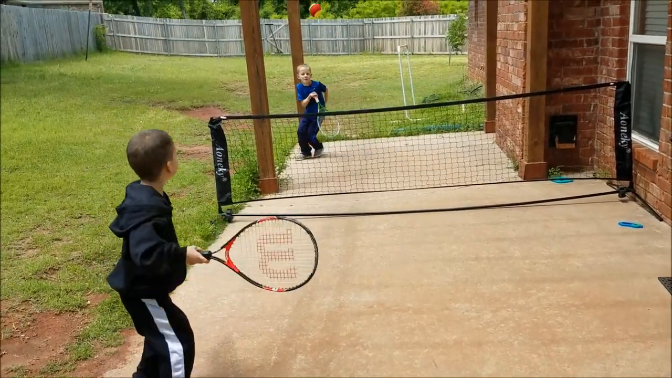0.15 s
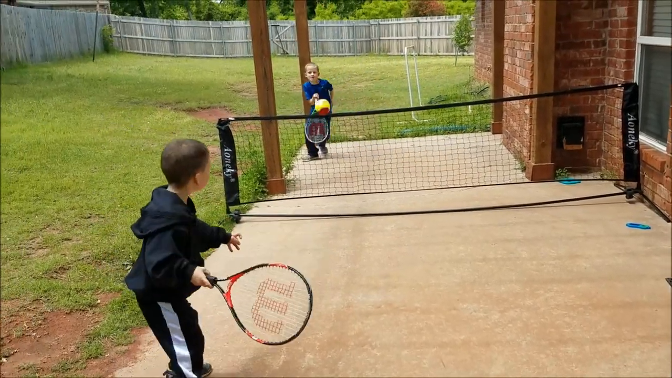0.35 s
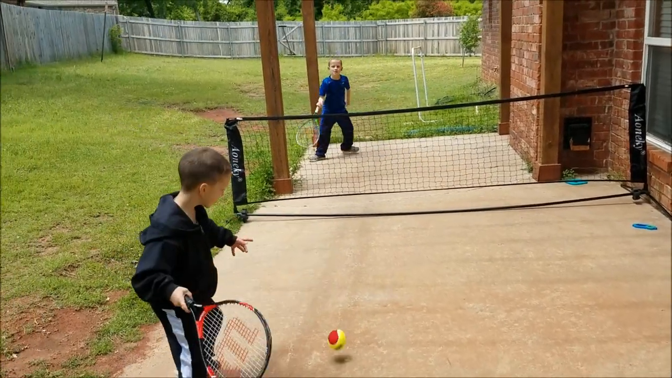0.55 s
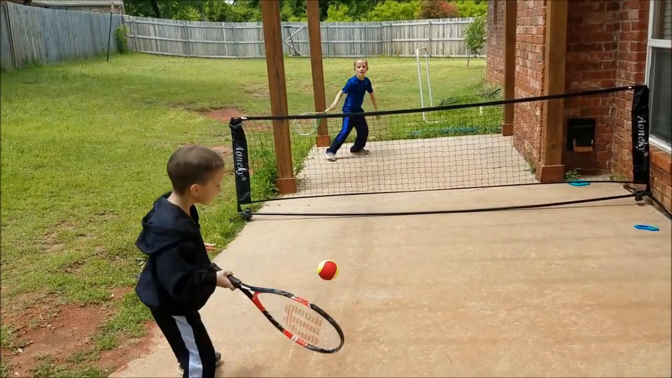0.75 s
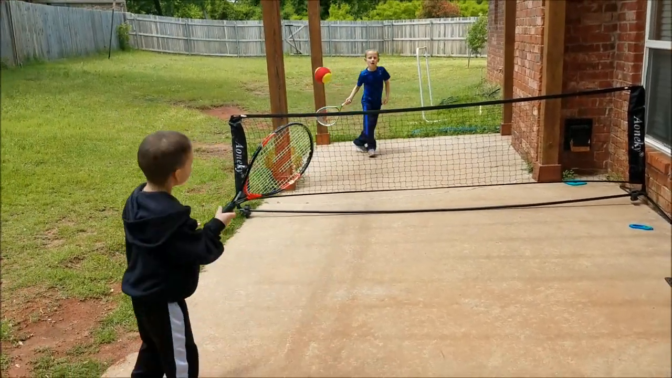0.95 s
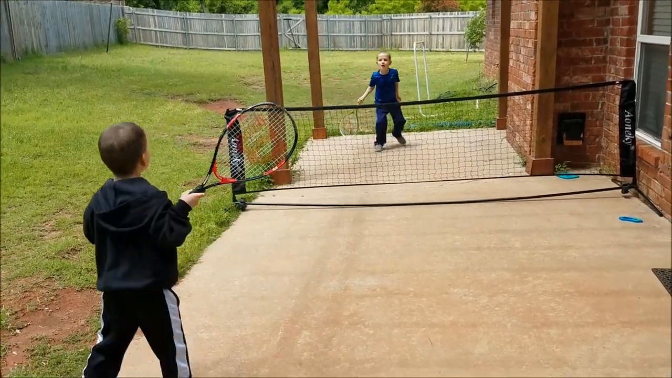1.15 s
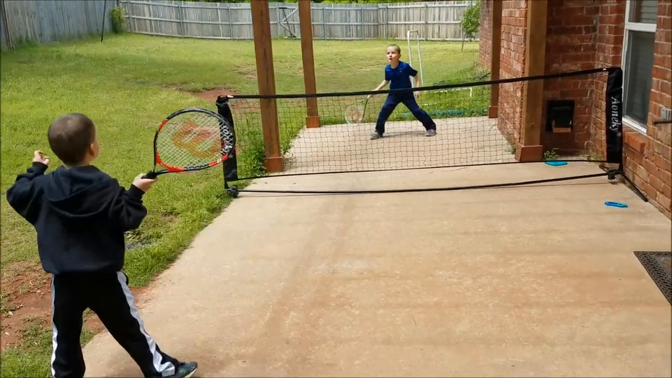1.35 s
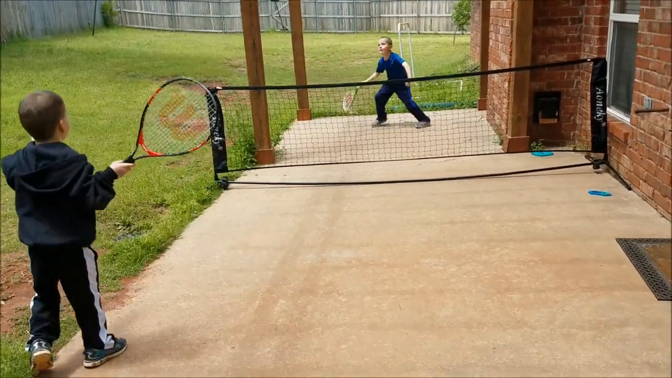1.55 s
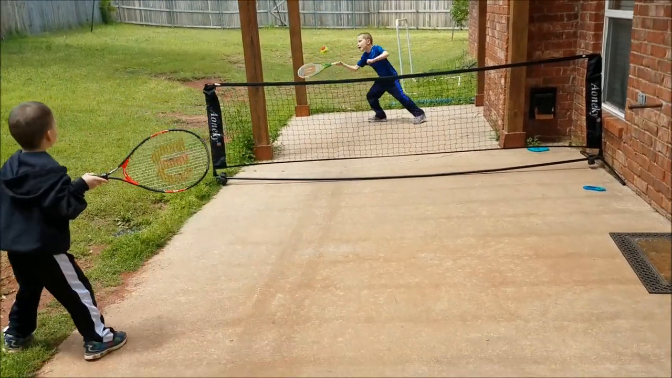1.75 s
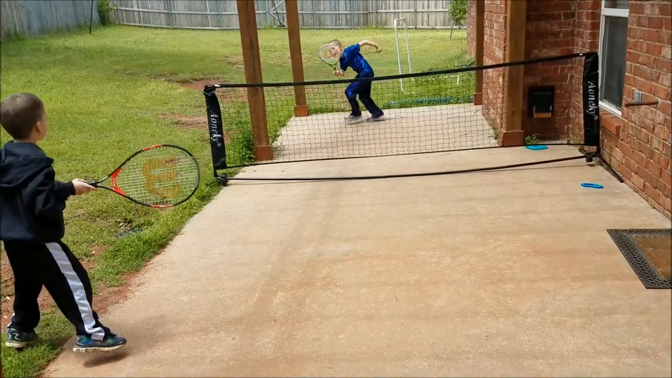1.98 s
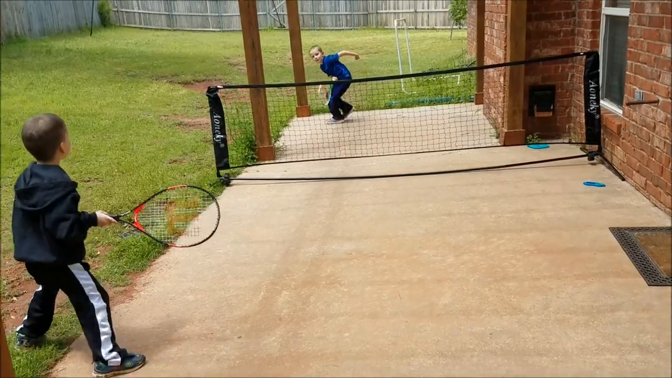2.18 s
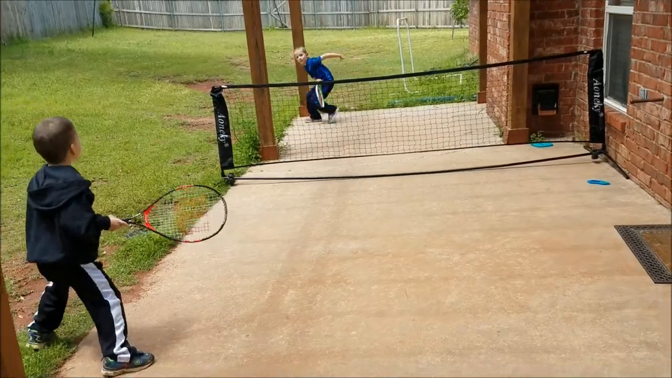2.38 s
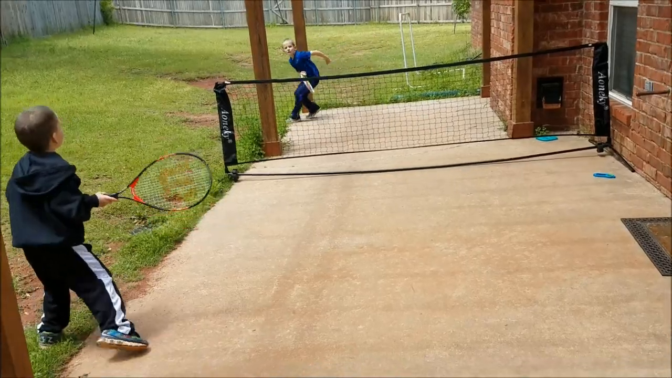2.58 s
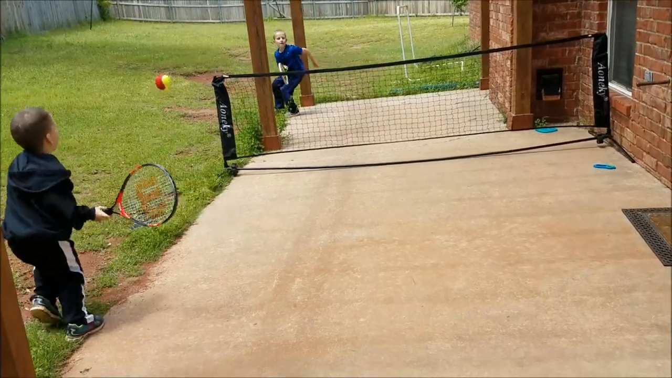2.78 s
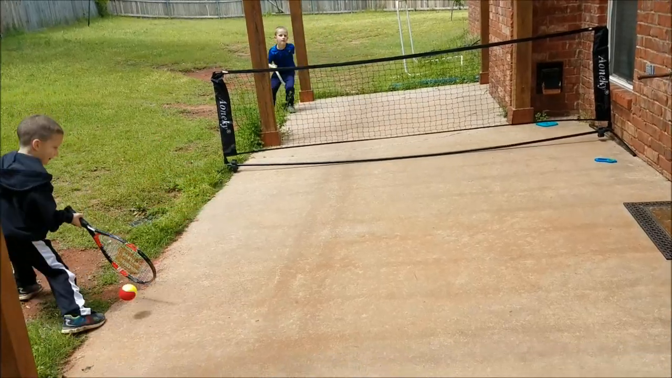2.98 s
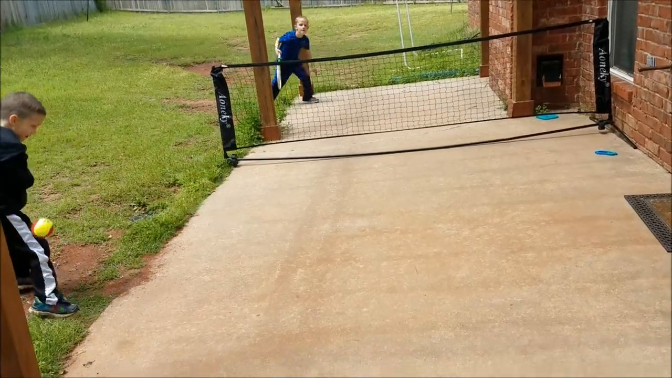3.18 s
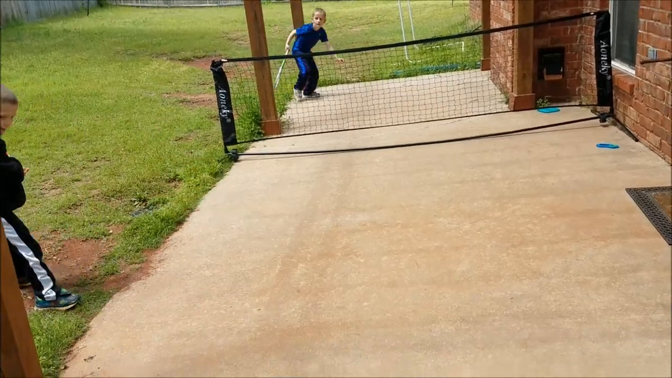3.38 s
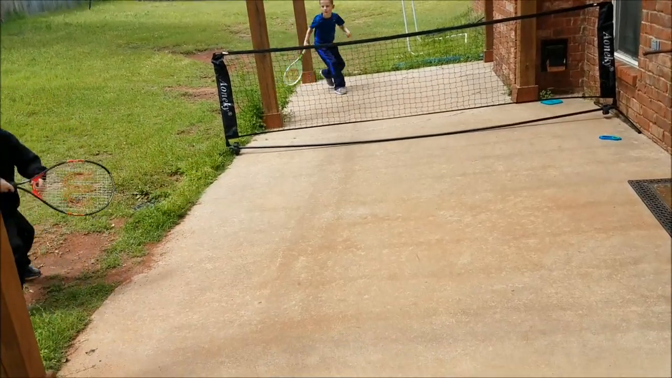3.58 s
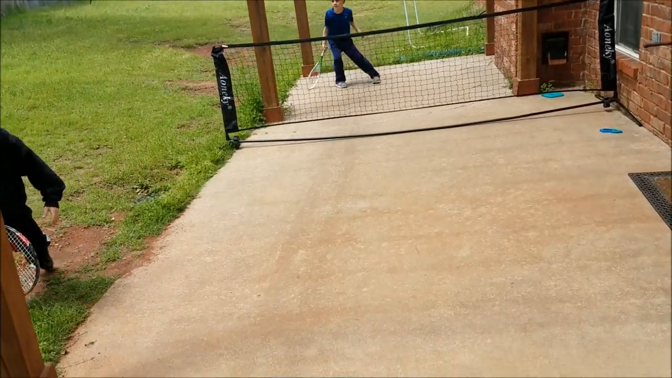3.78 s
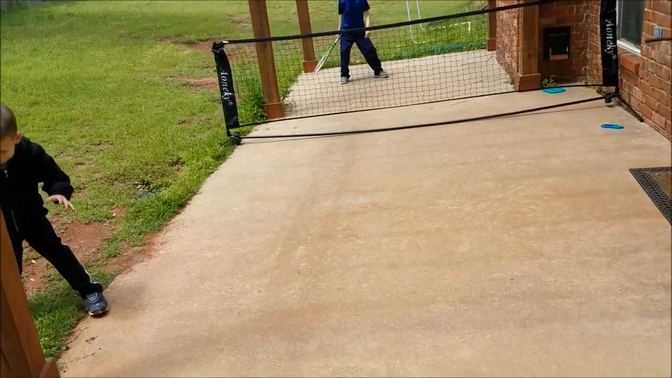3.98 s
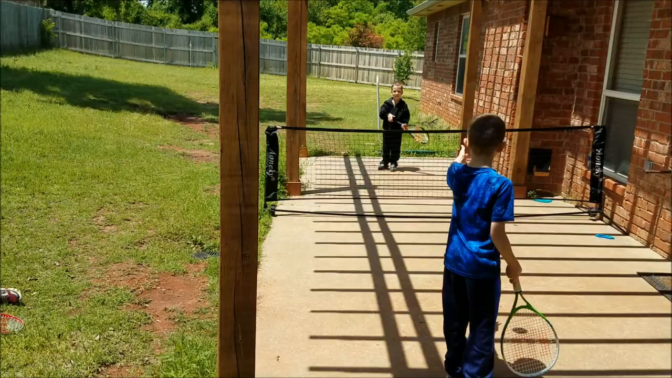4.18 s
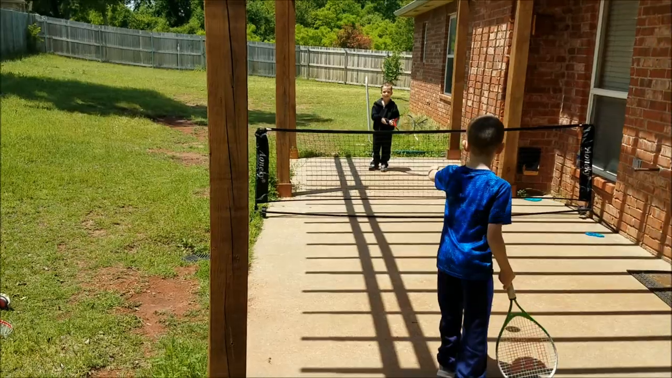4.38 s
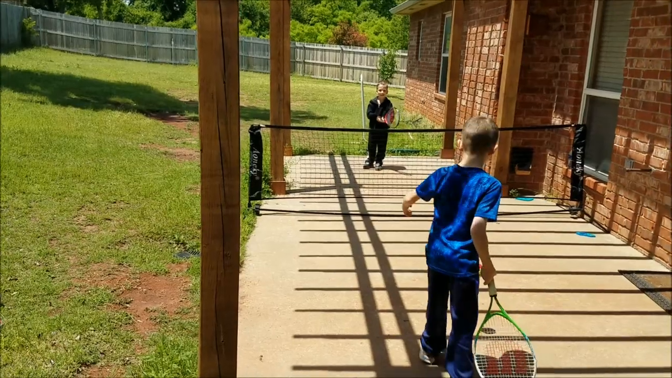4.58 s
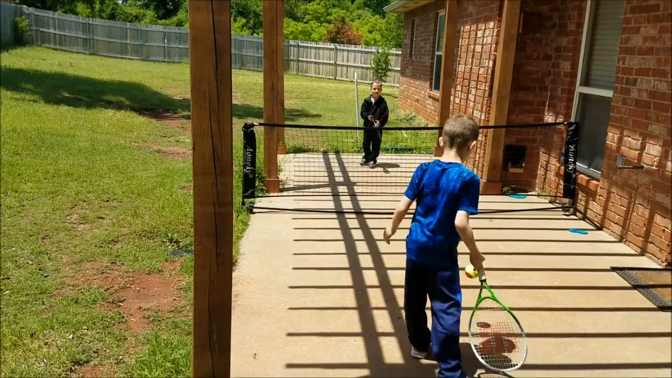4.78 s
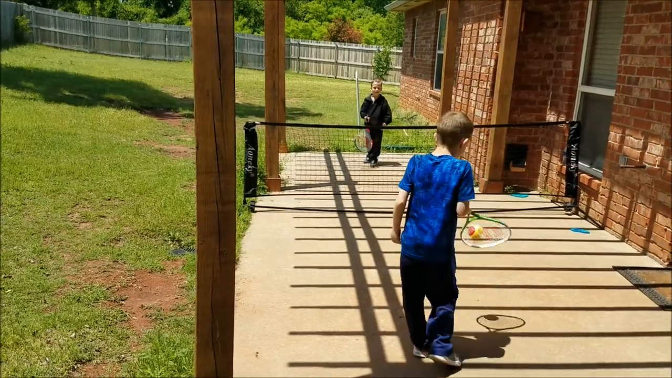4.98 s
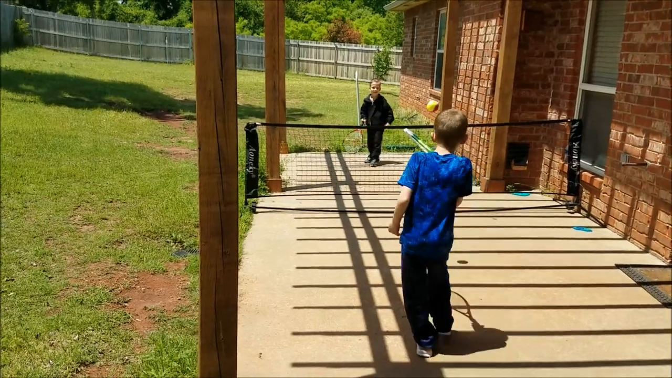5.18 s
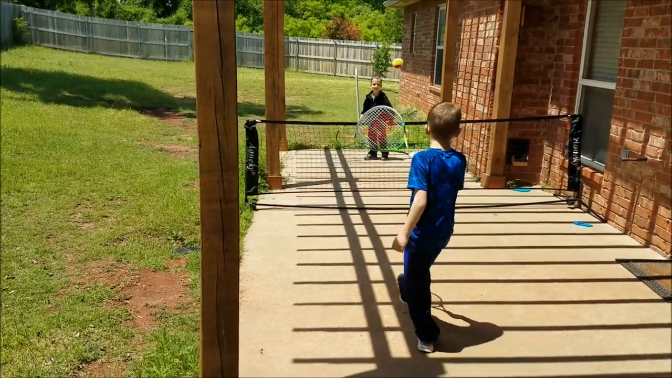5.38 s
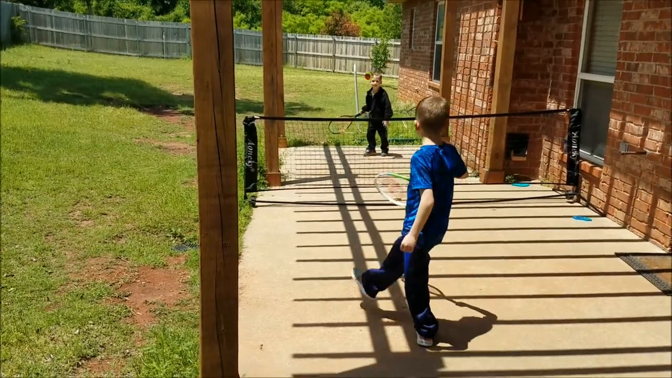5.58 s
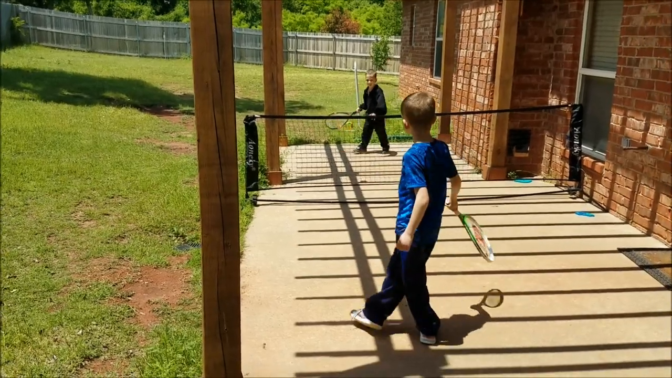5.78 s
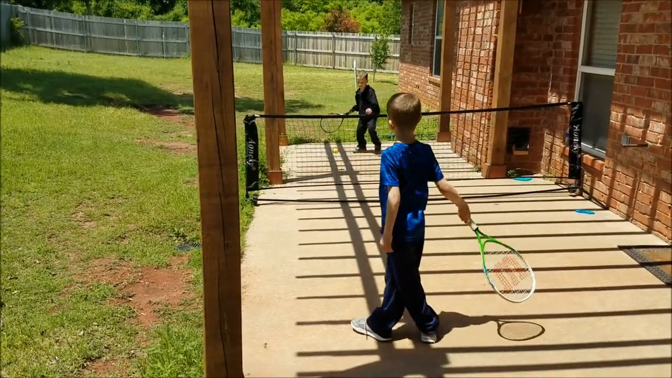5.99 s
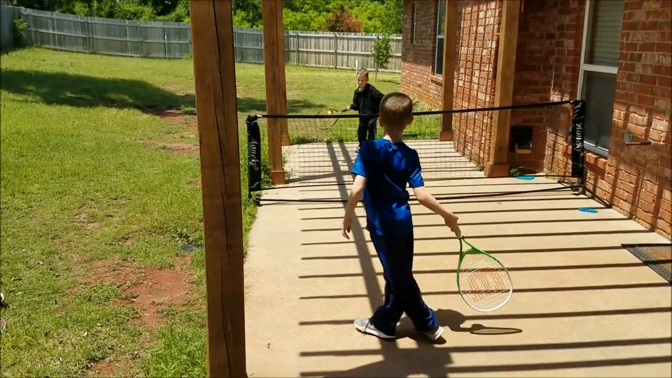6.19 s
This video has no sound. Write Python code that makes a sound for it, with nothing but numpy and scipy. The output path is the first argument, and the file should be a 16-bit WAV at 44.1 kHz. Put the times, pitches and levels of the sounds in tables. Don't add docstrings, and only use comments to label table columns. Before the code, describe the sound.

Casual backyard ball play heard in stereo from a few metres away under a patio roof. Sharp, hollow pops with low rubbery thuds come irregularly between dry shoe scrapes, grit ticks and short rubber squeaks. Later comes a loud racket knock, a bright rim clatter and a dull footfall. After a near-silent gap, a quieter yard ambience rises, with a distant thin bird, two softer hits, then a last knock and scuff. Breeze and leaf hiss lie underneath.

```python
import sys
import numpy as np
from scipy import signal
from scipy.io import wavfile
from scipy.ndimage import uniform_filter1d

SR = 44100
rng = np.random.default_rng(int(sys.argv[2]) if len(sys.argv) > 2 else 0)


def linear_from_db(decibels):
    return 10 ** (np.asarray(decibels, float) / 20)


def materialize(psi):
    bounded = np.clip(np.atleast_2d(psi).T, -1, 1)
    quanta = np.round(bounded * 32767).astype(np.int16)
    wavfile.write(sys.argv[1], SR, quanta)


N = 275625

# [f/Hz, density level/dB]
HUSH = [(120, -31), (200, -4), (252, -7), (290, -18.5), (365, 1), (426, -7.5), (545, -3.5), (1140, -10.5),
        (3070, -10), (8000, -28), (10400, -50), (17600, -120)]
FIZZ = [(2940, -27.5), (5000, -13), (5890, -5.5), (7940, -5.5), (10400, -4.5), (15100, -1.5), (15800, -5.5)]
WIND = [(12, -52), (20, -10.5), (22, -20.5), (81, 0), (195, -9), (253, -11), (280, -14.5), (300, -19),
        (390, -46.5), (660, -120)]
# [t/s, time to fade 20 dB/s, wind level/dB, hush lift level/dB]
GUSTS = [
    (0.77, 1.1, -50.5, -57.5),
    (1.83, 0.25, -53, -70),
    (2.4, 0.4, -59, -69.5),
    (2.72, 0.4, -54, -75),
    (3.65, 0.55, -48.5, -71),
    (4.0, 0.9, -46.5, -63.5),
    (4.35, 0.5, -51, -66),
    (4.84, 1.35, -51, -56.5),
    (6.04, 0.5, -59.5, -58.5),
]
# [t/s, time to fade 20 dB/s, level/dB]
RUSTLES = [
    (0.2, -0.3, -60),
    (0.7, 3, -78),
    (0.95, 1.6, -57.5),
    (1.6, 0.4, -59),
    (3.0, 1, -61.5),
    (3.87, 0.22, -53.5),
    (4.82, .5, -60),
    (6.04, 5, -67),
]
# [f/Hz, left-right level/dB]
SAME = [(30, .6), (80, 0.87), (150, 0.9), (400, 0.86), (1000, 0.12), (2500, 0.12), (5000, 0.14),
        (9000, 0.53), (15000, 0.22)]
SIDEWAYS = [(60, -0.5), (180, 0), (550, -1), (1650, 7), (4970, 3.5), (15000, 0.5)]
# [f/Hz, phase/rad]
LEAD = [(60, 0), (200, .1), (1300, 1.1), (2800, 1.5), (4600, 5.4), (5300, 6.1), (12000, 6.3), (16000, 5)]
# [t/s, length/s, f/Hz, level/dB, glide/Hz]
BIRD = [(3.115, 0.066, 3410, -59.5, -180), (4.9, .09, 3400, -71, -30), (5.08, 0.13, 1857, -69, 9),
        (5.3, .1, 1840, -78, 30), (5.39, 0.07, 2200, -69, -89.5), (5.485, 0.12, 2130, -67, -13),
        (5.66, 0.14, 2120, -68.5, 40), (5.9, .05, 2150, -70, 10), (6.04, .08, 2900, -71, 10),
        (5.598, 0.14, 2710, -71.5, -16), (6.046, 0.089, 2400, -67, 21), (6.14, 0.045, 2420, -62.5, 16)]

# [f/Hz, density level/dB]
GRIT = [(2940, -21.5), (5000, -3.5), (7090, -4), (10700, -2), (11600, 2.5), (15200, 6), (16300, -6.5),
        (16500, -47.5)]
SOLE = [(600, -33), (1100, -1), (2200, 1.5), (3500, -0.5), (6000, -12.5), (9000, -23)]
TREAD = [(150, -17.5), (300, -4), (600, 3), (950, -3.5), (1600, -36)]
# [f/Hz, left-right level/dB]
SHOE_SAME = [(150, 0.41), (400, 0.99), (1000, 0.17), (2500, 0.23), (5000, 0.52), (9000, 0.98),
             (15000, 0.24)]
SHOE_SIDEWAYS = [(150, -.5), (500, 2), (1500, 6), (3000, 6.5), (5500, 2.5), (9000, 1), (14000, 6.5)]
LINGER = [0.51, 0.78, 0.73]
# [t/s, time to fade 20 dB/s, grit, rubber, tread level/dB]
STAMPS = [(0.353, 0.14, -36, -38, -47), (0.524, 0.15, -49.5, -52, -69), (0.552, 0.1, -49.5, -56, -70),
          (0.441, 0.16, -53, -62, -70), (0.610, 1.1, -58, -53.5, -65), (1.022, 0.09, -45, -48, -48.5),
          (1.814, 0.44, -55.5, -50, -55), (2.072, 0.12, -47, -47, -60), (2.328, 0.46, -54.5, -51, -67),
          (2.965, 0.1, -54, -47, -51), (2.979, 0.0059, -60, -50, -42), (3.0, 0.13, -54, -46.5, -57),
          (3.564, 0.09, -45, -48, -59), (3.589, 0.22, -69, -52.5, -47), (3.7295, 0.06, -45.5, -40, -50),
          (3.8037, 0.05, -29.5, -38.5, -53.5), (4.032, 0.24, -54.5, -53, -52.5),
          (4.039, 0.02, -54, -49, -45), (4.645, 0.04, -56, -65.5, -73), (5.82, 0.2, -60.5, -56, -55),
          (5.867, 0.24, -53.5, -56, -74)]
# [t/s, time to fade 20 dB/s, grit, rubber, tread level/dB]
SLIDES = [(0.12, 0.52, -46.5, -53, -63.5), (0.201, 0.0628, -32, -35, -48), (0.363, 0.04, -40, -33, -40),
          (1.345, 0.5, -60, -48.5, -61), (1.48, 0.63, -52, -53.5, -71), (1.565, 0.03, -34.5, -59, -53),
          (1.7, 0.24, -57.5, -53.5, -56.5), (2.212, 1, -68, -64, -72), (2.378, 0.1, -76, -71, -49),
          (2.63, 0.14, -50.5, -52.5, -45), (2.93, 1.1, -61.5, -60, -69), (2.99, 0.18, -60, -50, -53),
          (3.116, 0.13, -52, -50, -43.5), (3.205, 0.06, -54.5, -49, -44.5), (3.63, 0, -76, -60.5, -50),
          (3.702, 0.04, -50, -65, -60), (3.72, 0.2, -64, -59, -55), (3.83, 0.22, -51, -47, -56.5),
          (4.023, 0, -53, -44, -64), (4.802, 0.04, -57, -54, -62), (5.42, 0.06, -58.5, -62, -65),
          (5.39, -0.03, -60, -66, -70), (5.135, 0.2, -65, -70, -70), (5.836, 1, -79, -66, -59.5),
          (6.188, 0.08, -54, -56, -58), (6.235, 0.1, -46.5, -51.5, -60), (4.012, 0.12, -51, -51, -53),
          (1.295, 0.03, -48, -50.5, -51.5)]
# [t/s, length/s, grit, rubber, tread level/dB]
DRAGS = [
    (0.002, 0.074, -43, -45, -41),
    (1.301, 0.078, -47, -49.5, -51),
    (1.397, 0.075, -46.5, -50.5, -70),
    (1.535, 0.055, -42, -44, -46.5),
    (2.191, 0.027, -59, -55, -54.5),
    (2.576, 0.06, -51, -51, -69.5),
    (2.758, 0.026, -50, -48.5, -46.5),
    (3.774, 0.03, -42, -48, -54),
]
# [t/s, peak level/dB, f/Hz, left-right level/dB]
TICKS = [(0.4439, -39, 13100, 6), (0.5242, -44, 12800, 5.0), (0.553, -39, 15100, 6), (0.985, -45, 13500, 5),
         (0.8245, -46, 13500, 6), (1.117, -44, 13000, 11.5), (1.133, -58, 14500, 4), (1.15, -45, 13500, 4),
         (1.157, -43, 12500, 4), (1.163, -49, 12500, 4), (0.612, -31.5, 9000, 4.5), (1.35, -38, 11900, 11),
         (1.367, -40, 15100, 8), (1.2905, -38, 14400, 7), (1.535, -25, 14700, 1), (1.5545, -26, 13400, 2),
         (1.571, -33, 14200, 6), (1.5633, -33, 15600, 2), (1.7868, -41, 14500, 9), (2.074, -39, 14300, 4),
         (2.187, -32.5, 14740, 5), (2.2104, -36, 15000, 7), (2.3271, -41, 14200, 7),
         (2.262, -52, 11300, 2.5), (2.7937, -34, 12500, 5.5), (3.0694, -40, 13900, 14),
         (3.5638, -30.5, 15500, -0.5), (3.8037, -18.5, 14530, 6), (4.4812, -44, 13600, 7),
         (4.8017, -35, 14190, 9), (4.827, -33, 8900, 10), (4.856, -38, 9500, -13.5),
         (4.927, -42, 12700, 3.5), (5.8316, -40, 15000, 7), (5.8705, -24.5, 16000, 7),
         (5.8882, -34, 14000, 15)]
# [t/s, peak level/dB, f/Hz, left-right level/dB]
TAPS = [(0.3556, -32, 4200, 3), (1.023, -52, 2470, 6), (1.3528, -30, 2201, 9), (1.532, -38, 3460, 5.8),
        (1.5621, -29.5, 1210, 3.7), (1.5536, -34, 1500, 4), (2.5778, -34, 1900, 3.7),
        (2.7573, -36.5, 2500, 8.0), (4.0323, -32, 1500, 3), (4.0334, -35, 3600, 3),
        (2.9646, -39, 2220, 7.0), (2.966, -36, 3500, 6), (5.8208, -39, 1320, 5.3), (5.821, -43, 2300, 5),
        (5.832, -41, 1500, 5), (5.8707, -38, 1700, 5), (5.8705, -36, 8500, 6), (5.889, -40, 8500, 8),
        (5.022, -47, 13000, 5)]
# [t/s, time to fade 20 dB/s,
# f/Hz, level/dB]
SQUEAKS = [(0.199, .025, 2300, -39), (0.362, .025, 2500, -36), (2.579, .012, 1800, -43),
           (2.606, .015, 2800, -51), (2.629, .008, 600, -44), (2.637, .018, 350, -39),
           (2.992, .006, 450, -40), (3.108, .035, 750, -47), (4.018, .015, 3600, -50),
           (4.0335, .005, 750, -34), (4.045, .012, 750, -39), (5.965, .006, 420, -40),
           (5.9695, .008, 400, -40), (5.977, .01, 1250, -44), (5.988, .02, 400, -50),
           (4.88, .025, 1800, -56), (6.186, .012, 1450, -51), (6.229, .04, 1420, -46),
           (6.232, .04, 1990, -45)]
# [t/s, time
# to fade 20 dB/s, f/Hz, level/dB]
BLOOMS = [(0.842, 0.005, 3200, -38), (0.871, 0.01, 1650, -33), (0.862, .01, 1300, -30),
          (0.852, .02, 2600, -38), (0.843, .008, 1700, -34), (0.857, .01, 1600, -33),
          (1.84, 0.023, 1250, -36), (2.98, .03, 380, -34.5), (3.007, 0.013, 2200, -39),
          (4.7095, 0.0046, 2200, -48), (4.7225, 0.0092, 1450, -33.5), (4.729, .006, 1100, -35),
          (5.024, 0.008, 1900, -43), (4.718, .012, 2200, -41), (5.029, .008, 700, -36.5),
          (5.035, 0.0067, 1050, -39), (5.04, 0.014, 1350, -41.5), (5.047, 0.033, 1170, -40)]

# [f/Hz, level/dB, t60/s]
FRAME = [(1146, -16.5, 0.057), (1920, -9.5, .07), (2000, -15, 0.056), (2630, -5.5, 0.027),
         (2910, 1.5, 0.03), (3500, -5, 0.017), (3890, -5, .025), (4450, -1, 0.02), (5200, -7.5, 0.013),
         (6600, -7.5, .012)]
# [t/s, level/dB, brightness/dB per octave]
CLATTERS = [
    (3.7300, -28.5, -1),
    (3.7323, -35, -2.5),
    (3.7406, -37, -8.5),
    (3.8044, -26.5, 3),
    (3.808, -29, 0.5),
    (3.8105, -33, -1),
    (3.8127, -32.5, -1),
]
# [t/s, f/Hz, level/dB, t60/s]
RINGS = [(0.8462, 1300, -14, .012), (0.8474, 1200, -14, .024), (0.8688, 1250, -22, .04),
         (0.8715, 1400, -20, .025), (0.8795, 1150, -22, .04), (0.885, 1300, -27, .02),
         (0.909, 1200, -32, .03), (0.8535, 1000, -21.5, .04), (0.8465, 560, -20, 0.026),
         (3.0052, 1150, -18, .016), (2.9998, 1150, -18, .014), (3.016, 1200, -28, .03),
         (3.029, 1200, -30, .04), (2.9785, 400, -31, .03), (2.9905, 1800, -35, .008),
         (3.593, 236, -34, 0.12), (3.595, 353, -27, .11), (0.617, 237, -31, .1), (4.7088, 1260, -24, .012),
         (5.0235, 1440, -38, 0.017)]

# [t/s, level/dB]
ECHOES = [(.0022, -13), (.009, -17), (.0145, -18), (.0265, -21), (.035, -20)]
# [f/Hz, t60/s]
PATIO = [(150, 0.2), (600, 0.22), (1500, 0.19), (2500, 0.14), (4000, 0.06), (12000, 0.023)]

# [t/s, landing crack level/dB, then spring-off crack, shell thud, air cavity
# level/dB re landing crack]
HITS = [
    (0.6105, -8, -7, -3, -7.5),
    (0.8392, -22.5, 12.5, 6, 3.5),
    (1.816, -21.5, -6.5, -11, 0.5),
    (2.352, -19.5, -12, -7.5, -2.5),
    (2.999, -14.5, -3, -5.5, -2),
    (4.708, -19, -2, -2.5, -7),
    (5.0225, -35, 5.5, 6.5, -10),
]
FIRMNESS = [0.987, 1.01, 1, 1.67, 1.124, 1.01, 0.94]
THUMPS = [
    (4.0063, -55.5, -27, 24, -14),
    (4.0312, -34, -24, 10.8, -3),
]
HEELS = [
    (2.1146, -37.5, 1.5, 1.5, 0),
    (2.626, -38, -6, 5, 1),
]
KNOCKS = [
    (3.2025, -36, 1, 1.5, -3.5),
    (3.5889, -16.5, -12, -3, -1),
    (5.9587, -26, -4.5, -3.5, -3),
]
# [f/Hz, level/dB, t60/s]
SHELL = [(191.6, -2, 0.069), (160.8, -6, 0.12), (237, -5, 0.11), (394.5, -8, 0.05)]
# [f/Hz, level/dB, t60/s]
CAVITY = [(1020, -11, 0.02), (1190, -7, 0.022), (697, -8, 0.013), (1600, -12, 0.018), (2340, -15, 0.02)]

# [t/s, level/dB]
CUT = [
    (4.139, 0),
    (4.143, -14),
    (4.172, -21),
    (4.178, -36),
    (4.219, -44),
    (4.221, -22),
    (4.262, -14),
    (4.272, -2),
    (4.28, 0),
]

JOIN_S = 4.22
FADE_IN_S, FADE_IN_TAU_S = 4.248, 0.28
OFFSET, EDGE_HZ = -.0006, 15950
HUSH_DB, FIZZ_DB, CALM_DB = (-53.5, -55.5), (-66, -70.5), (-65.5, -85)
BIRD_DB = 7
STAMP_RISE_S, STAMP_HOLD = 0.00069, 0.048
SLIDE_RISE, SLIDE_HOLD = 0.58, 0.11
DRAG_RISE_S, DRAG_FADE_S = .004, 0.053
NOTE_RISE, NOTE_WIDTH = .4, .2
SQUASH_DB, SQUASH_S = -6, 0.0051
CONTACT_S, LONGER_PER_DB = 0.0055, .0065
CRACK_HZ, HEEL_HZ, SOFTER_HZ_PER_DB = 1775, 1020, 20.5
STIFFER = 1.7
SOFT_BALL_DB = -16


def evened(x):
    return x / np.sqrt(np.mean(x ** 2) + 1e-20)


def read(points, hz):
    f, value = np.transpose(points)
    return np.interp(np.log(hz + 1), np.log(f + 1), value)


def add(mix, s, sound):
    part = mix[..., round(s * SR):][..., :sound.shape[-1]]
    part += sound[..., :part.shape[-1]]


def ring(hz, db, t60, t):
    return -linear_from_db(db - 60 * t / t60) * np.sin(2 * np.pi * hz * t)


def swell(t, s, rise_s, hold_s, fade_s):
    rise_s, fade_s = np.maximum(rise_s, 2e-4), np.maximum(fade_s, 2e-3)
    outside = np.maximum((s - t) / rise_s, (t - s - hold_s) / fade_s)
    return linear_from_db(-20 * np.maximum(outside, 0))


def noise(colour, ports, patchy_db, flicker_db, size=512):
    frames, hz = 4 * N // size + 5, np.fft.rfftfreq(size, 1 / SR)
    a, b, c, d, patches = rng.standard_normal((frames, len(hz), 5), np.float32).T
    patches = uniform_filter1d(patches, size=6, axis=0)
    patches = evened(uniform_filter1d(patches, size=10, axis=1))
    same, sideways_db, lead = (read(table, hz)[:, None] for table in ports)
    same = np.clip(same, -1, 1)
    left = a + 1j * b
    right = (same * left + np.sqrt(1 - same ** 2) * (c + 1j * d)) * np.exp(-1j * lead)
    z = np.array([left * linear_from_db(sideways_db / 2), right / linear_from_db(sideways_db / 2)])
    flicker = flicker_db * rng.standard_normal(frames)
    z *= linear_from_db(read(colour, hz)[:, None] + patchy_db * patches + flicker)
    x = signal.istft(z, nperseg=size, noverlap=size * 3 // 4)[1][:, :N]
    return x / np.sqrt(np.mean(x.mean(0) ** 2))


def patio(x, tail_db):
    taps = np.zeros((2, 13000))
    at = np.arange(100, 12980, 20) + rng.integers(0, 20, (2, 644))
    np.put_along_axis(taps, at, rng.choice([-1., 1.], at.shape), 1)
    hz, t, z = signal.stft(taps, SR, nperseg=256)
    same = np.clip(read(SAME, hz), -1, 1)[:, None]
    z[1] = same * z[0] + np.sqrt(1 - same ** 2) * z[1]
    decay = linear_from_db(-60 * t / read(PATIO, hz)[:, None])
    tail = signal.istft(z * decay, SR, nperseg=256)[1]
    tail *= linear_from_db(tail_db) / np.linalg.norm(tail[0])
    for (s, db), shift in zip(ECHOES, rng.uniform(.95, 1.05, len(ECHOES))):
        tail[:, round(s * shift * SR)] += linear_from_db(db)
    return signal.oaconvolve(np.atleast_2d(x), tail, axes=1)


def air():
    t = np.arange(0, N + 64, 64) / SR
    second = t > JOIN_S
    hush, fizz, wind = (linear_from_db(np.where(second, db[1], db[0])) ** 2 for db in (HUSH_DB, FIZZ_DB, CALM_DB))
    for s, fade_s, wind_db, hush_db in GUSTS:
        same_shot = second == (s > JOIN_S)
        gust = swell(t, s, 0.71 * fade_s, 0, fade_s) ** 2 * same_shot
        wind = wind + linear_from_db(2 * wind_db) * gust
        hush = hush + linear_from_db(2 * hush_db) * gust
    for s, fade_s, db in RUSTLES:
        same_shot = second == (s > JOIN_S)
        fizz = fizz + linear_from_db(2 * db) * swell(t, s, fade_s, 0, fade_s) ** 2 * same_shot
    hush, fizz, wind = (np.interp(np.arange(N) / SR, t, np.sqrt(power)) for power in (hush, fizz, wind))
    ports = SAME, SIDEWAYS, LEAD
    return (hush * noise(HUSH, ports, .7, .3)
            + fizz * noise(FIZZ, ports, 1.2, .8)
            + wind * noise(WIND, ports, 0.79, 1.7, size=4096))


def bird():
    out = np.zeros(N)
    for s, length, hz, db, glide_hz in BIRD:
        t = np.arange(0, length, 1 / SR)
        turns = np.cumsum(hz + glide_hz * t / length) / SR
        whistle = np.sin(2 * np.pi * turns) * signal.windows.tukey(len(t), .3)
        add(out, s, linear_from_db(db + BIRD_DB) * whistle)
    waver = evened(uniform_filter1d(rng.standard_normal(N), size=500))
    return out * (1 + .15 * waver)


def scuffs():
    power, ports = np.zeros((3, N)), (SHOE_SAME, SHOE_SIDEWAYS, LEAD)
    linger = np.array(LINGER)[:, None]
    # row, rise s, hold s, fade s
    shapes = [(row, STAMP_RISE_S, STAMP_HOLD * row[1], row[1]) for row in STAMPS]
    shapes += [(row, DRAG_RISE_S, row[1], DRAG_FADE_S) for row in DRAGS]
    shapes += [(row, SLIDE_RISE * row[1], SLIDE_HOLD * row[1], row[1]) for row in SLIDES]
    for (s, _, *db), rise_s, hold_s, fade_s in shapes:
        start = max(s - 3 * rise_s, 0)
        t = np.arange(start, s + hold_s + 4 * fade_s, 1 / SR)
        stroke = linear_from_db(np.array(db))[:, None] * swell(t, s, rise_s, hold_s, fade_s * linger)
        add(power, start, stroke ** 2)
    grit, rubber, tread = np.sqrt(power)
    unevenness = evened(uniform_filter1d(rng.standard_normal(N), size=40))
    grains = evened(linear_from_db(1.8 * unevenness))
    return (grit * grains * noise(GRIT, ports, 1.2, 1.3)
            + rubber * noise(SOLE, ports, 2.2, 1.8)
            + tread * noise(TREAD, ports, 5.2, 2.9))


def ticks():
    out, t = np.zeros((2, N)), np.arange(500) / SR
    puffs = rng.standard_normal((len(TICKS + TAPS), 500))
    for (s, db, hz, pan_db), puff in zip(TICKS + TAPS, puffs):
        rough = 1 + uniform_filter1d(puff, size=int(SR / hz)) * np.sqrt(SR / hz)
        onset = 1 - np.exp(-t * hz * 3)
        click = ring(hz, db, .002 + 22 / hz, t) * rough * onset
        add(out, s, np.array([click * linear_from_db(pan_db / 2), np.roll(click, 3) / linear_from_db(pan_db / 2)]))
    return out


def squeaks_and_blooms():
    out, t = np.zeros((2, N)), np.arange(6000) / SR
    lead_in_s = .04
    rubs = rng.standard_normal((len(SQUEAKS + BLOOMS), 2, 6000))
    for (s, fade_s, hz, db), (a, b) in zip(SQUEAKS + BLOOMS, rubs):
        r = np.exp(-np.pi * NOTE_WIDTH * hz / SR)
        narrow = signal.lfilter([1], [1, -2 * r, r * r], a + 1j * b)
        note = evened((narrow * np.exp(2j * np.pi * hz * t)).real)
        note = note * linear_from_db(db) * swell(t, lead_in_s, NOTE_RISE * fade_s, 0, fade_s)
        add(out, s - lead_in_s, np.array([linear_from_db(2.5) * note, linear_from_db(-2.5) * np.roll(note, 6)]))
    return out


def racket_frame():
    out, low, t = np.zeros(N), np.zeros(N), np.arange(6000) / SR
    for s, db, tilt_db in CLATTERS:
        clatter = np.zeros(len(t))
        for k, (hz, mode_db, t60) in enumerate(FRAME):
            bright_db = tilt_db * np.log2(hz / 2900)
            clatter += (-1) ** k * ring(hz, db + mode_db + bright_db, t60, t)
        add(out, s, clatter)
    for s, hz, db, t60 in RINGS:
        add(low if hz < 500 else out, s, ring(hz, db, max(t60, .005), t))
    return low + np.array([linear_from_db(2.0) * out, linear_from_db(-3.0) * np.roll(out, 3)])


def snap(hz, db, t, damping=1.0):
    u = 2 * hz * t
    return -linear_from_db(db) * u * np.exp(damping * (1 - u)) * np.sin(np.pi * u)


def ball():
    t, out = np.arange(6000) / SR, np.zeros((2, N))
    blows = HITS + THUMPS + HEELS + KNOCKS
    detune = rng.uniform(.95, 1.05, (len(blows), 9))
    detune[len(HITS + THUMPS):, 5:] *= STIFFER
    detune[:len(HITS), 5:] *= np.array(FIRMNESS)[:, None]
    felt = signal.butter(3, [95, 6200], "bandpass", fs=SR, output="sos")
    pitch = [CRACK_HZ] * len(HITS) + [HEEL_HZ] * len(THUMPS + HEELS) + [CRACK_HZ] * len(KNOCKS)
    for (s, db, spring_db, thud_db, cavity_db), hz, d in zip(blows, pitch, detune):
        hz = hz - SOFTER_HZ_PER_DB * spring_db
        contact_s = CONTACT_S * (1 + LONGER_PER_DB * spring_db)
        cavity = sum(ring(f * k, db + cavity_db + g, t60, t) for (f, g, t60), k in zip(CAVITY, d))
        cavity = cavity * (1 - np.exp(-t / 0.00017))
        treble = snap(hz, db, t) + cavity * linear_from_db(min(-spring_db, 0))
        spring_off = snap(0.61 * hz, db + spring_db - 1.5, t, damping=1.4)
        add(treble, contact_s, spring_off + cavity * linear_from_db(min(spring_db, 0)))

        thud = -sum(ring(f * k, db + thud_db + g - 6.5, t60 / k ** 2, t)
                    for (f, g, t60), k in zip(SHELL, d[5:]))
        squash_turn = np.minimum(t * d[5] / SQUASH_S, 1) ** 1.5
        squash = linear_from_db(db + thud_db + SQUASH_DB) * np.sin(2 * np.pi * squash_turn)
        bass = np.roll(thud * (1 - np.exp(-t / .002)), 75) + np.roll(squash, 56)

        soft_ball = s > JOIN_S and d[5] < 1.2
        edge = snap(1.52 * hz, db - 3.5 + SOFT_BALL_DB * soft_ball, t)
        treble, bass, edge = signal.sosfilt(felt, [treble, bass, edge])
        add(out, s, patio(treble + .4 * bass + .4 * edge, -9.5))
        treble = treble + edge + np.roll(edge, round(contact_s * SR)) * linear_from_db(min(spring_db, 0) - 18)
        lag = -4 if s > JOIN_S else 4
        left = linear_from_db(3.3) * treble + bass
        right = linear_from_db(-3.3) * np.roll(treble, lag) + np.roll(bass, 2 * lag)
        add(out, s, np.roll([left, right], 12, 1))
    return out


def scene():
    background = air() + bird()
    shoes = scuffs() + ticks()
    shoe_echo = linear_from_db(-15.5) * patio(shoes, -2.9)[:, :N]
    return background + shoes + shoe_echo + squeaks_and_blooms() + racket_frame() + ball()


def top_cut(x):
    return signal.sosfilt(signal.butter(12, 16990, fs=SR, output="sos"), x)


def record(dry):
    s, db = np.transpose(CUT)
    t = np.arange(N) / SR
    since_s = np.maximum(t - FADE_IN_S, .02)
    fade = np.where(t > JOIN_S, 1 - np.exp(-since_s / FADE_IN_TAU_S), 1)
    joined = (dry + OFFSET) * fade * linear_from_db(np.interp(t, s, db))
    band_limit = signal.firwin(401, EDGE_HZ, window=("kaiser", 7), fs=SR)
    mix = signal.oaconvolve(joined, band_limit[None], "same")
    return top_cut(mix)


dry = scene()
out = record(dry)
materialize(out)
```